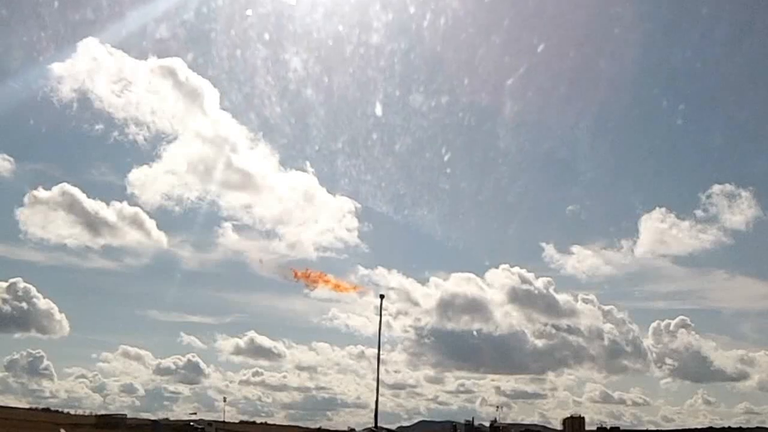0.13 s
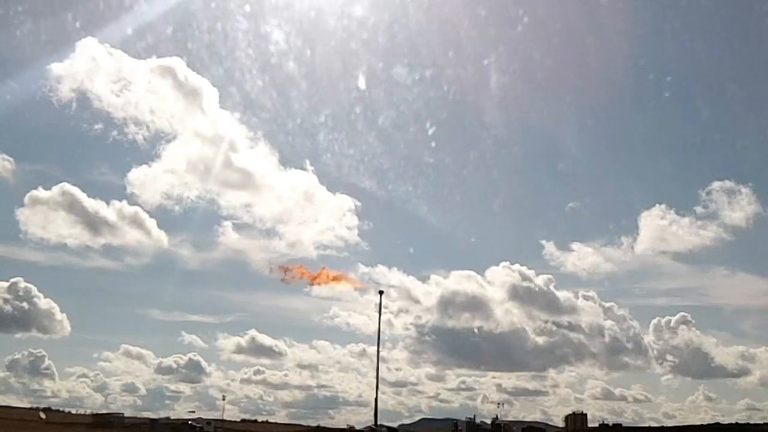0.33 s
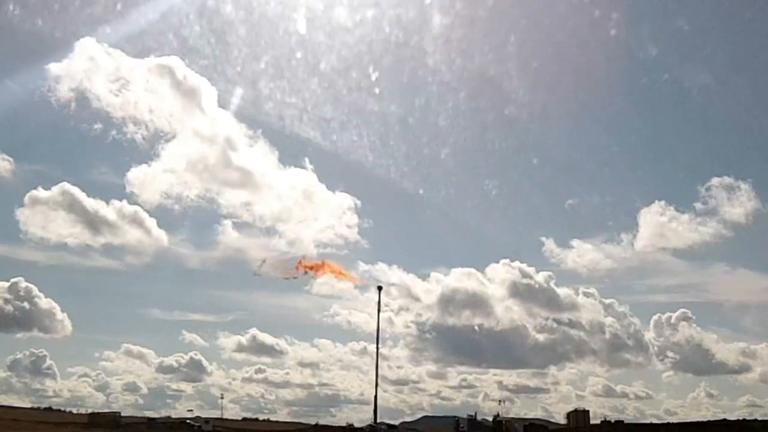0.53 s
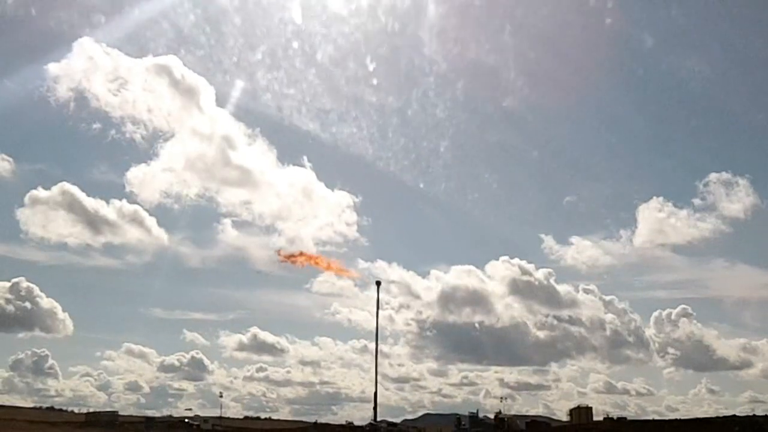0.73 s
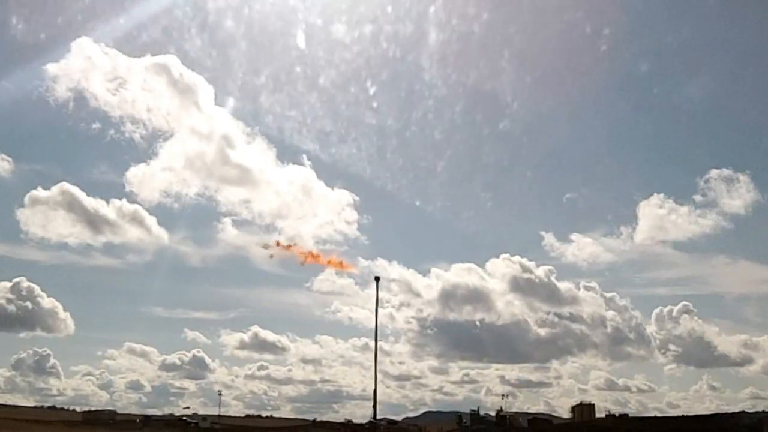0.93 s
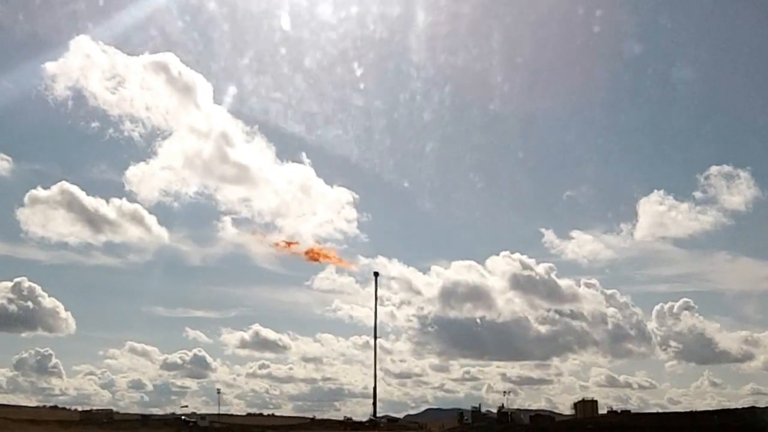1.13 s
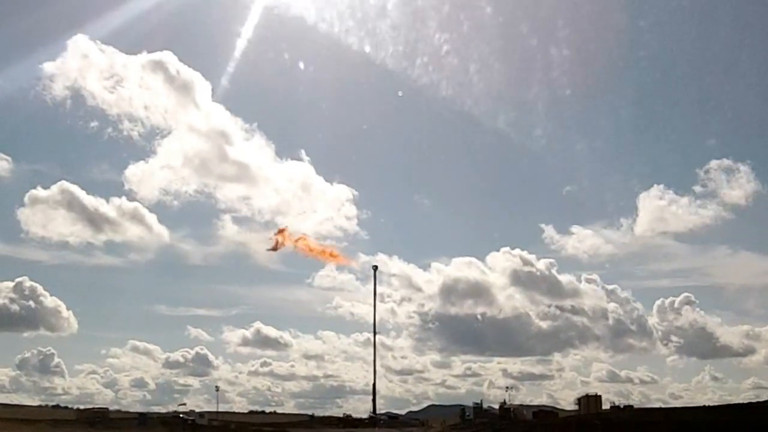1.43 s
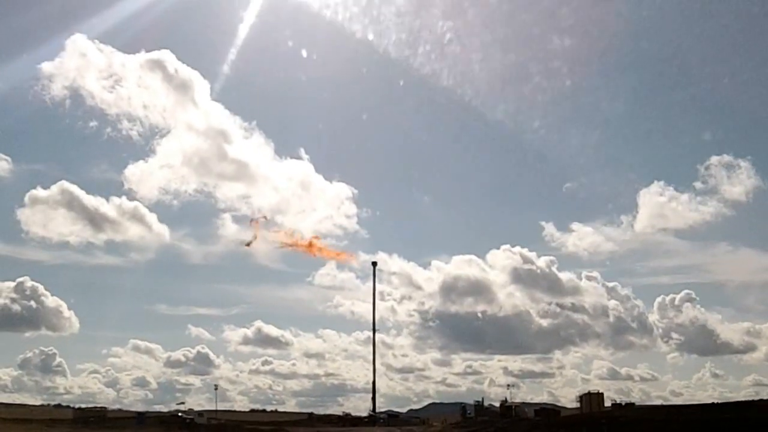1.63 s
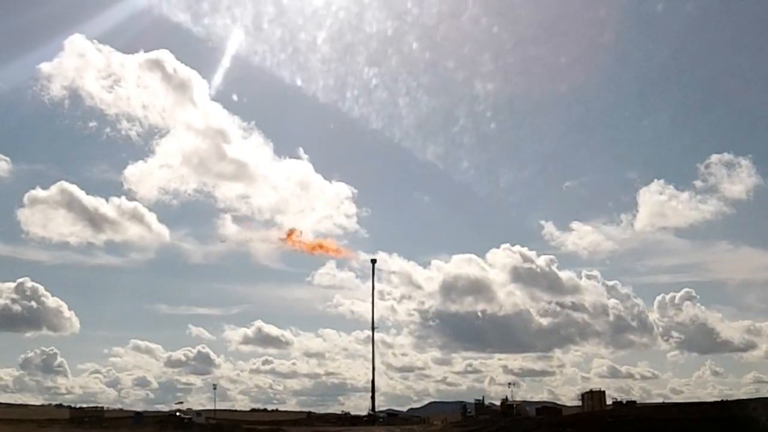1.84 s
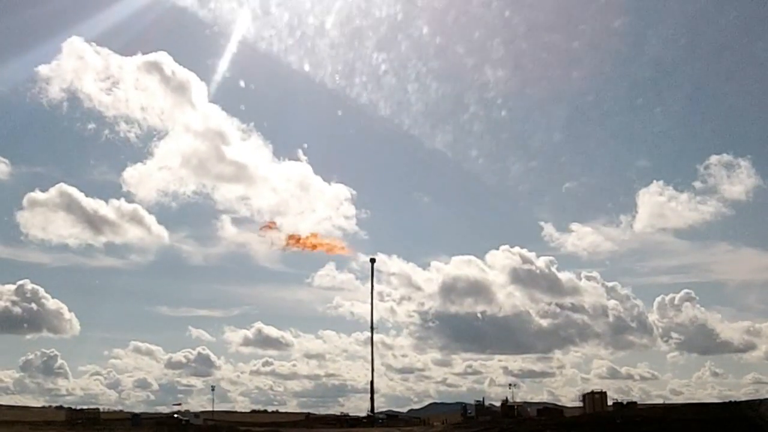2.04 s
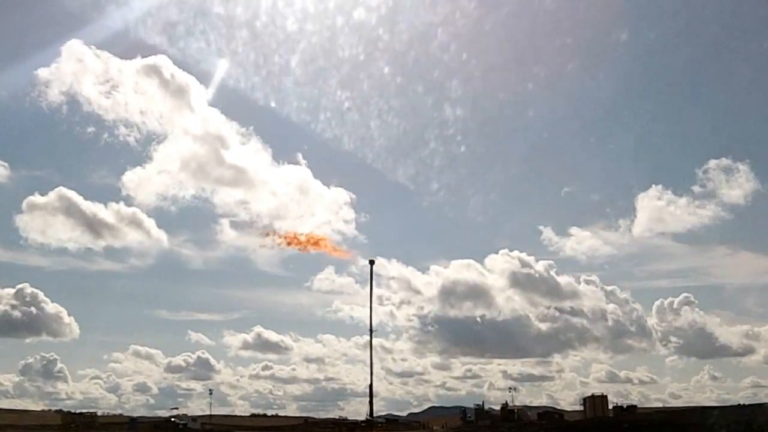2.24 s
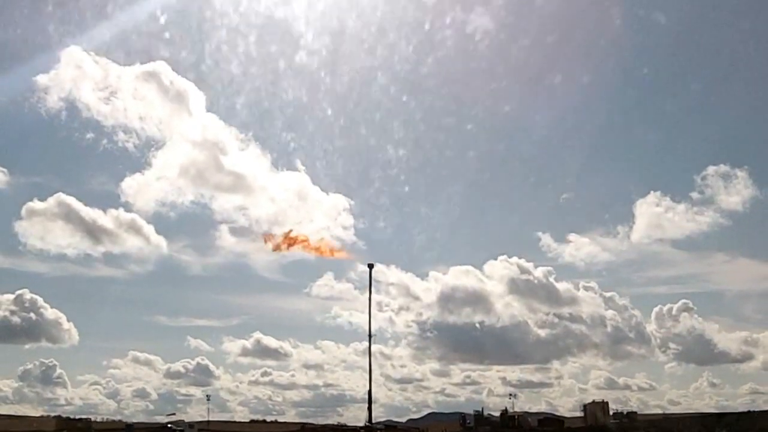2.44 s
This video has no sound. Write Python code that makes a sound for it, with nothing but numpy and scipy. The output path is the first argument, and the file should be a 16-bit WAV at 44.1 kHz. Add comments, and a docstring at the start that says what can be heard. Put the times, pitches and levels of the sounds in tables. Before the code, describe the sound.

Heavy low air throbbing and buffeting in a moving vehicle's cabin starts abruptly, surging unevenly many times a second, with short gritty buzzes and ticks on the surges and quiet road hiss beneath, on a small overloaded microphone.

```python
"""Cabin air throb.

Air throbs in the cabin of a moving vehicle and buffets a small microphone: resonant low noise and shaped surges.
Shaped noise gives low turbulence, road hiss, a dull roar and faint steady hiss.
The level moves in small hard steps: quick runs down (a short buzz) on many surges, slower ticks up between.
The sound starts abruptly after a moment of silence.
"""
import sys
import numpy as np
from scipy import signal
from scipy.fft import rfft, irfft
from scipy.io import wavfile
from scipy.ndimage import uniform_filter1d

SR = 44100
rng = np.random.default_rng(int(sys.argv[2]) if len(sys.argv) > 2 else 0)


def dump_mix(stems):
    """Bounce the given channels to the path in sys.argv[1] as a 16-bit WAV at rate SR."""
    frames = np.atleast_2d(stems).T  # one column per channel
    limited = np.clip(frames, -1, 1)  # hard clip at full scale
    pcm = np.round(limited * 32767).astype(np.int16)
    wavfile.write(sys.argv[1], SR, pcm)


N = 113778
START_S = 0.1197

# faint steady hiss, spectrum: freq_hz, density_db (relative, per Hz)
HISS_SPECTRUM = [(300, 0), (2000, -18), (6000, -23.5), (15000, -28)]
HISS_DB = -74.5

# road hiss before the level steps: time_s, level_db
ROAD_LEVEL = [(.1, -61), (.85, -57.5), (1.15, -60.5), (1.35, -59), (1.54, -62), (2.0, -57.5), (2.3, -59.5),
              (2.38, -61), (2.58, -56)]
# road hiss, spectrum: freq_hz, density_db (relative, per Hz)
ROAD_SPECTRUM = [(150, -6), (400, -5), (700, -15.5), (1200, -28), (2500, -29.5), (5000, -42.5), (9000, -52),
                 (15000, -63)]

# dull roar: time_s, level_db
ROAR_LEVEL = [(.1, -72), (1.49, -68), (1.57, -49.5), (1.68, -69), (2.2, -72), (2.4, -52), (2.58, -53)]
ROAR_HZ, ROAR_WIDTH_HZ = 245, 280

# turbulence on the microphone, before lumps and level steps: time_s, level_db
GUST_LEVEL = [(0.13, -33), (0.18, -41.5), (0.23, -33.5), (0.35, -33.5), (0.39, -35), (0.42, -27),
              (0.46, -33.5), (0.68, -35.5), (0.78, -30.5), (0.82, -32), (0.94, -27.5), (1.13, -39.5),
              (1.23, -26.5), (1.34, -44), (1.52, -31.5), (1.58, -21), (1.63, -33.5), (1.66, -28.5),
              (1.73, -31), (1.85, -35.5), (1.9, -33), (1.99, -33), (2.11, -31), (2.16, -38.5), (2.22, -31),
              (2.24, -38), (2.31, -35.5), (2.39, -25.5), (2.46, -30.5), (2.55, -26), (2.58, -26.5)]
# turbulence, spectrum: freq_hz, density_db (relative, per Hz)
GUST_SPECTRUM = [(25, -0.5), (48, -4), (58, 2.1), (66, -1.5), (90, -10.5), (125, -8.5), (200, -27),
                 (330, -38), (600, -86)]
GUST_LUMP_RMS_DB, LUMP_HZ, LUMP_WIDTH_HZ = 1.5, 38, 15.7

# cabin throb between surges, before rounding and level steps: time_s, level_db
THROB_LEVEL = [(0.13, -17.5), (0.57, -17), (0.65, 0), (0.68, -20), (0.87, -19), (0.92, -25), (0.95, -14),
               (1.36, -16.5), (1.53, -23.5), (1.57, -25), (2.14, -15), (2.17, -20.5), (2.22, -17),
               (2.4, -24.5), (2.44, -14.5), (2.58, -17.5)]
THROB_HZ, THROB_WIDTH_HZ = 15.46, 7.44
THROB_LIMIT_RMS = 1.52  # crests round off towards this multiple of the rms

# strong pressure surges: first_step_down_s, steps_down (count, rounded; none below 1),
# height (signed, before level steps), rise_before_step_ms, nominal_length_ms
PRESSURE_SURGES = [(0.1214, 10.5, 0.27, 5.56, 19.5), (0.1491, 4, -0.19, 6.9, 53),
                   (0.2039, 2.5, 0.2, 37, 33.6), (0.232, -0.5, -.17, 14, 39), (0.2703, 8, -0.14, 9.6, 19.4),
                   (0.3409, 9.5, -0.23, 14, 36), (0.4389, 6.5, -0.2, 13.6, 28.3),
                   (0.5106, 12.5, -0.23, 5.8, 31), (0.583, 0, -0.18, 8, 39), (0.6241, 15, 0.29, 6.6, 34),
                   (.651, -1, -0.19, 7.7, 41), (0.7624, 3.5, 0.23, 3.9, 17), (0.7813, 4.5, -0.2, 8.6, 44),
                   (0.798, 6.5, -0.19, 23, 51), (0.822, -1.5, 0.2, 12.4, 45.5),
                   (0.8617, 11, -0.28, 15.8, 27.5), (0.9705, 7, -0.2, 3.7, 26.7),
                   (1.0094, 7.5, 0.25, 16.5, 29.2), (1.0408, 2, -0.16, 13.4, 51.6),
                   (1.0857, 11, 0.26, 21, 47), (1.2232, 4.5, -0.15, 20.3, 40.6),
                   (1.249, 14, 0.3, 5.4, 28.7), (1.2854, 2, -0.22, 9.3, 34), (1.321, 0, 0.27, 17, 39),
                   (1.357, 0, -0.25, 15.6, 34.5), (1.392, 0, 0.13, 17, 32), (1.4209, 4.5, -0.18, 11.8, 44),
                   (1.459, -0.5, 0.11, 24.3, 43), (1.5804, 6, -0.22, 4.9, 49), (1.5974, 8, -0.25, 10.2, 30),
                   (1.624, 0, 0.17, 15, 31), (1.672, 0.5, 0.19, 6, 15.4), (1.6938, 4.5, -0.28, 6.4, 14.5),
                   (1.7155, 2.5, -0.2, 15.2, 32.5), (1.7243, 2.5, -0.21, 18.5, 24.0),
                   (1.7365, 4.5, 0.25, 8.2, 25), (1.761, 5, -0.16, 7.5, 21), (1.8018, 3.5, 0.21, 25, 32.0),
                   (1.8293, 4, -0.16, 15.6, 37), (1.916, 3, 0.24, 6.4, 30.5), (1.9234, 4, 0.12, 29, 33),
                   (1.945, 2.5, -0.28, 9.4, 19), (1.9532, 1.5, -0.22, 15.3, 21), (2, 3, -0.18, 7.2, 23),
                   (2.0445, 2.5, -0.18, 16, 28.5), (2.069, 0.5, .19, 9.5, 24.4),
                   (2.088, 0, -0.18, 4.9, 19.5), (2.1102, 5.5, 0.25, 7.6, 19.0),
                   (2.1341, 2.5, -0.16, 18.3, 35), (2.2129, 14.5, -0.25, 4.6, 35), (2.245, 0, 0.23, 15, 35),
                   (2.276, 0, -0.17, 13.5, 31.5), (2.398, 2, -0.13, 1.8, 10), (2.436, 6.5, 0.21, 9.2, 14),
                   (2.46, 7.5, -0.18, 9, 18), (2.532, 0, 0.2, 8.1, 11.7), (2.5523, 5.5, -0.19, 3.7, 11.6)]
CREST_LAG_MS = 2.13  # crest after first_step_down_s

# runs of level steps up: first_step_up_s, steps_up (count)
STEPS_UP = [(.1448, 1), (.1755, 2), (0.1899, 3), (0.2283, 3), (0.2503, 6), (0.292, 4), (0.3387, 1),
            (0.3659, 14), (0.465, 9), (0.5593, 6), (0.6487, 2), (0.6706, 12), (0.7447, 4), (.8115, 6),
            (0.8444, 1), (0.887, 4), (0.9297, 2), (0.9487, 1), (1.0066, 1), (1.037, 1), (1.082, 1),
            (1.1145, 7), (1.1632, 1), (1.1783, 6), (1.2202, 1), (1.2788, 1), (1.395, 5), (1.454, 12),
            (1.5393, 7), (1.5779, 1), (1.6221, 10), (1.754, 2), (1.7862, 3), (1.8544, 3), (1.8917, 5),
            (1.942, 1), (1.9725, 4), (2.0195, 5), (2.0667, 2), (2.0932, 4), (2.1291, 1), (2.1625, 2),
            (2.1892, 5), (2.2391, 2), (2.2535, 1), (2.2693, 2), (2.3011, 6), (2.3489, 7), (2.4114, 1),
            (2.4328, 1), (2.4518, 1), (2.4784, 2), (2.4941, 8), (2.5471, 1), (2.565, 3)]
STEP_DB, DOWN_PER_S, UP_PER_S = 0.7766, 750, 187.5
CENTRE_S, SMOOTH_S = 0.54, 0.0085  # moving-average lengths

MIC_TOP_HZ, MIC_DRIFT_HZ, STOPBAND_HZ = 13900, 4, 16600
MIC_DIP_HZ, MIC_DIP_WIDTH_HZ, MIC_DIP_SHARE = 7800, 3520, 0.73


def from_db(db):
    """dB to gain."""
    return 10 ** (np.asarray(db) / 20)


def rms_one(x):
    """Scale to unit rms."""
    return x / np.sqrt(np.mean(x ** 2) + 1e-20)


def in_time(rows):
    """Interpolate (time_s, value) rows at every sample."""
    time_s, value = np.transpose(rows)
    return np.interp(np.arange(N) / SR, time_s, value)


def coloured(spectrum):
    """Filter white noise to a spectrum, linear in dB over log frequency; unit rms."""
    hz, db = np.transpose(spectrum)
    bin_hz = np.arange(N // 2 + 1) * SR / N + 1  # +1 Hz avoids log(0)
    shape = from_db(np.interp(np.log(bin_hz), np.log(hz), db, left=-90))
    return rms_one(irfft(rfft(rng.standard_normal(N)) * shape, N))


def resonance(x, hz, width_hz):
    """Two-pole band-pass, about unit gain at the peak."""
    radius = np.exp(-np.pi * width_hz / SR)
    zeros = np.array([1, 0, -1]) * (1 - radius * radius) / 2
    poles = [1, -2 * radius * np.cos(2 * np.pi * hz / SR), radius * radius]
    return signal.lfilter(zeros, poles, x)


def level_steps():
    """Sum equal dB jumps into a staircase, less its moving average."""
    jumps_db = np.zeros(N + SR)
    for runs, rate, sign in ((PRESSURE_SURGES, DOWN_PER_S, -1), (STEPS_UP, UP_PER_S, 1)):
        for first_s, steps, *_ in runs:
            step_s = first_s + np.arange(round(steps)) / rate
            np.add.at(jumps_db, np.round(step_s * SR).astype(int), sign * STEP_DB)
    stair_db = np.cumsum(jumps_db[:N])
    return stair_db - uniform_filter1d(stair_db, int(CENTRE_S * SR))


def steady_hiss():
    """Stationary noise at constant level."""
    return from_db(HISS_DB) * coloured(HISS_SPECTRUM)


def road_hiss(steps_db):
    """Broadband road noise that follows the level steps."""
    return from_db(in_time(ROAD_LEVEL) + steps_db) * coloured(ROAD_SPECTRUM)


def dull_roar():
    """Noise twice through a broad low resonance."""
    once = resonance(rng.standard_normal(N), ROAR_HZ, ROAR_WIDTH_HZ)
    twice = resonance(once, ROAR_HZ, ROAR_WIDTH_HZ)
    return from_db(in_time(ROAR_LEVEL)) * rms_one(twice)


def turbulence():
    """Low noise whose level wavers at random, in lumps."""
    lumps = rms_one(resonance(rng.standard_normal(N), LUMP_HZ, LUMP_WIDTH_HZ))
    level_db = in_time(GUST_LEVEL) + GUST_LUMP_RMS_DB * lumps
    return from_db(level_db) * coloured(GUST_SPECTRUM)


def free_throb():
    """Noise-driven cabin air resonance with softly limited crests."""
    white = rng.standard_normal(N + SR)  # first second lets the resonance settle
    narrow = resonance(white, THROB_HZ, THROB_WIDTH_HZ)
    swing = rms_one(resonance(narrow, THROB_HZ, 2 * THROB_WIDTH_HZ)[SR:])
    swing = THROB_LIMIT_RMS * np.tanh(swing / THROB_LIMIT_RMS)
    return from_db(in_time(THROB_LEVEL)) * swing


def cabin_throb():
    """Free throb gives way to an asymmetric cosine pressure swing at each surge."""
    t = np.arange(N) / SR
    surge, weight = np.zeros(N), np.zeros(N)
    for first_s, _, height, rise_ms, length_ms in PRESSURE_SURGES:
        rise_s = (rise_ms + CREST_LAG_MS) / 1000
        fall_s = max(length_ms / 1000 - rise_s, rise_s / 2)
        crest_s = first_s + CREST_LAG_MS / 1000
        start = max(int((crest_s - 2 * rise_s) * SR), 0)
        span = slice(start, int((crest_s + 2 * fall_s) * SR))
        from_crest_s = t[span] - crest_s
        phase = np.pi / 2 * from_crest_s / np.where(from_crest_s < 0, rise_s, fall_s)
        share = np.cos(phase / 2) ** 2
        surge[span] += share * height * np.cos(phase)
        weight[span] += share
    free_share = np.clip(1 - weight, 0, 1)
    return surge / np.maximum(weight, 1) + free_share * free_throb()


def scene():
    """Sum the layers; low sounds and road hiss carry level steps."""
    steps_db = level_steps()
    smooth_len = int(SMOOTH_S * SR)
    smooth_db = uniform_filter1d(uniform_filter1d(steps_db, smooth_len), smooth_len)
    background = steady_hiss() + road_hiss(steps_db) + dull_roar()
    # low sounds keep only the fast part of the steps
    low = from_db(steps_db - smooth_db) * (turbulence() + cabin_throb())
    return (background + low)[None]


def record(dry):
    """Soften the top, remove slow drift, mute until the start, dip the treble, cut the top."""
    x = signal.sosfilt(signal.butter(2, MIC_TOP_HZ, fs=SR, output="sos"), dry)
    x = x - uniform_filter1d(x, int(SR / MIC_DRIFT_HZ))
    x = x * (np.arange(N) >= START_S * SR)
    x = x - MIC_DIP_SHARE * resonance(x, MIC_DIP_HZ, MIC_DIP_WIDTH_HZ)
    return signal.sosfilt(signal.cheby2(12, 70, STOPBAND_HZ, fs=SR, output="sos"), x)


dry = scene()
out = record(dry)
dump_mix(out)
```